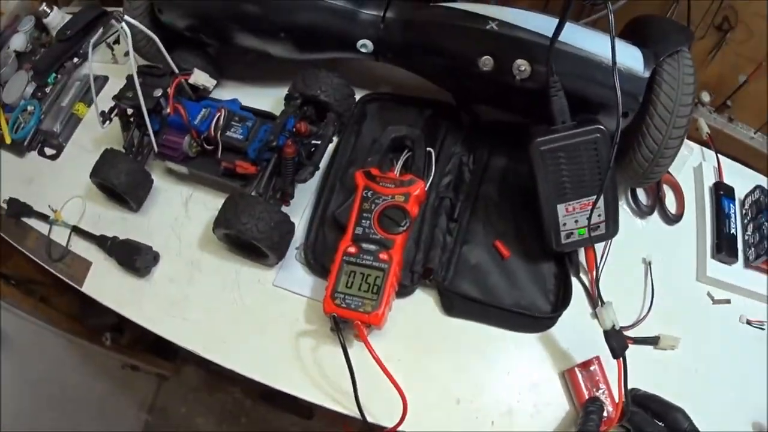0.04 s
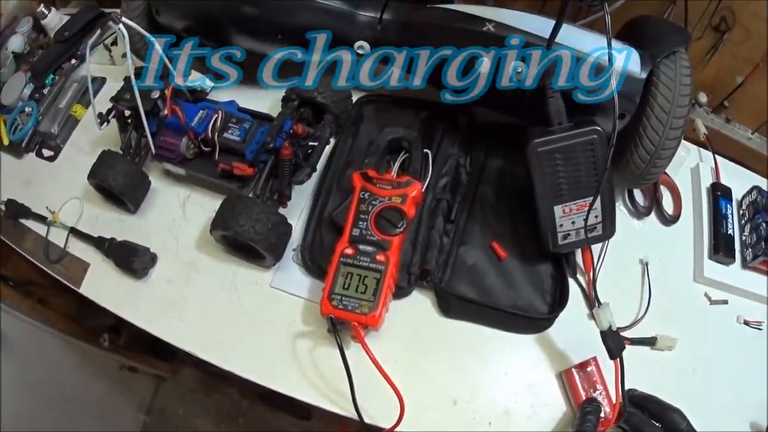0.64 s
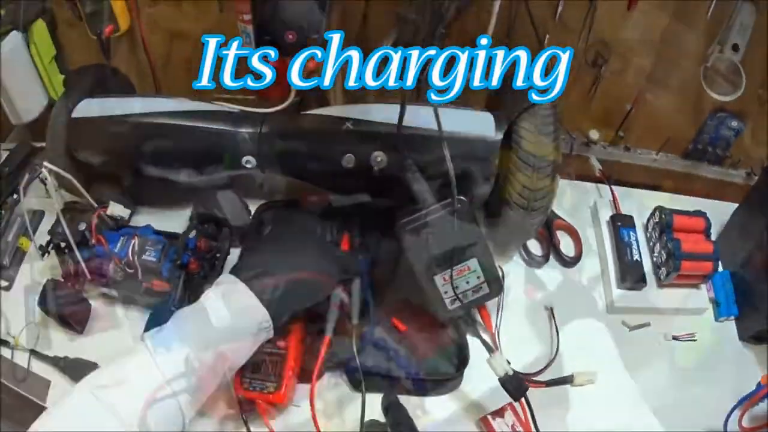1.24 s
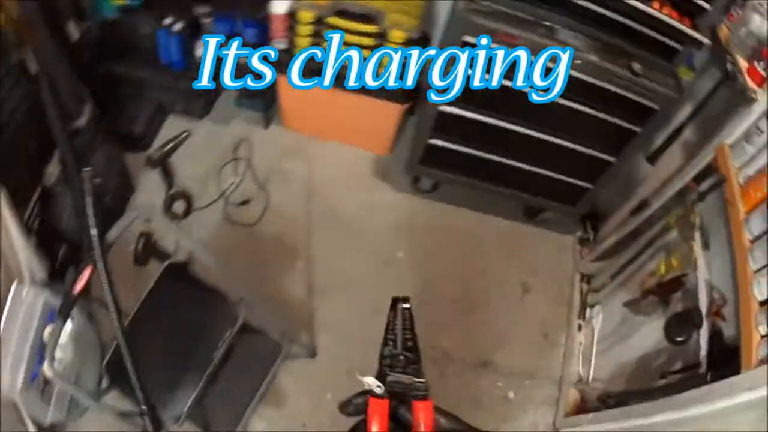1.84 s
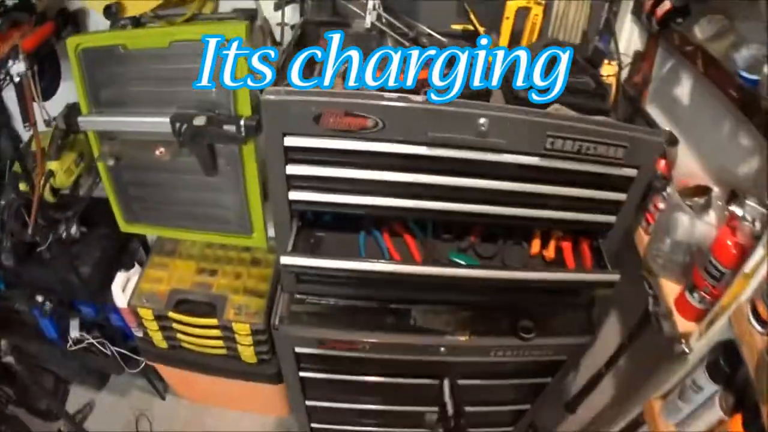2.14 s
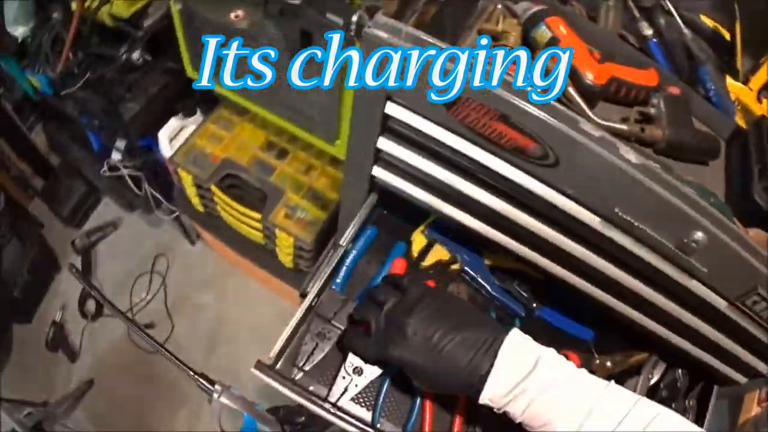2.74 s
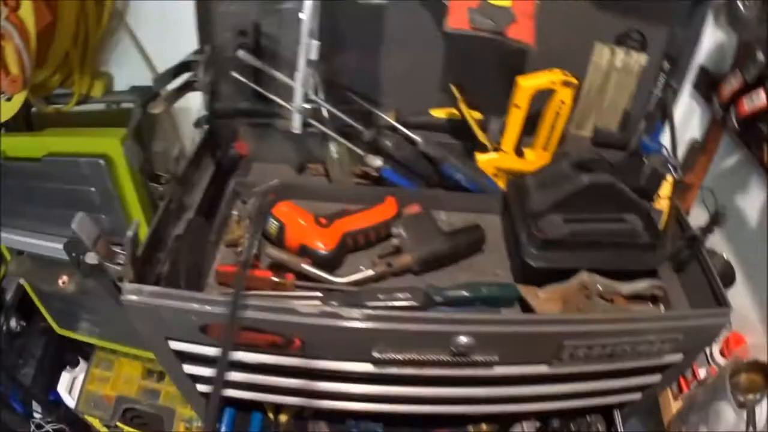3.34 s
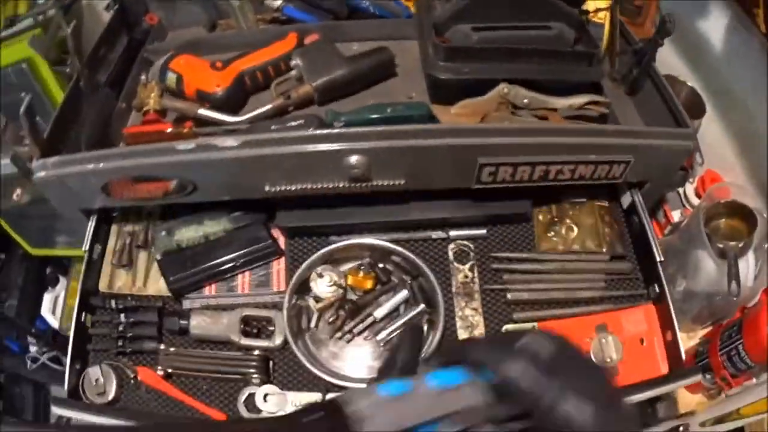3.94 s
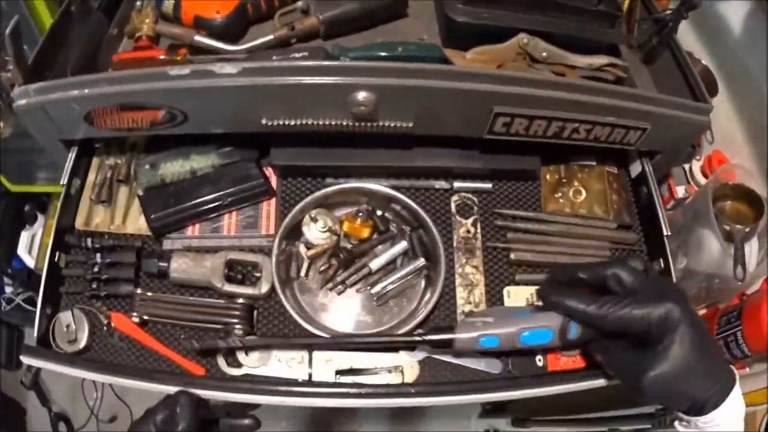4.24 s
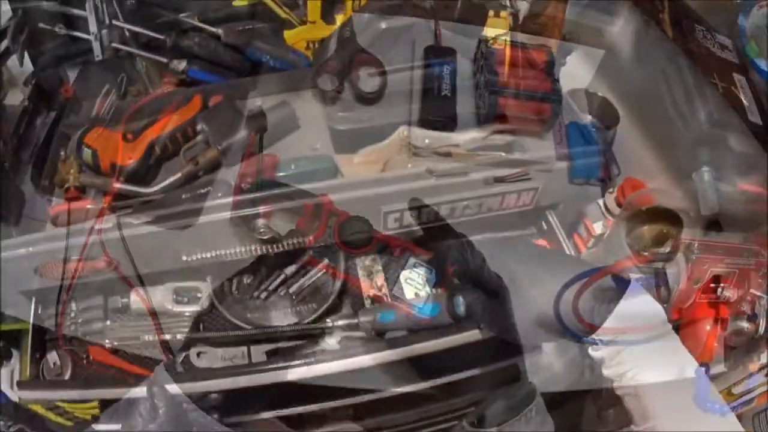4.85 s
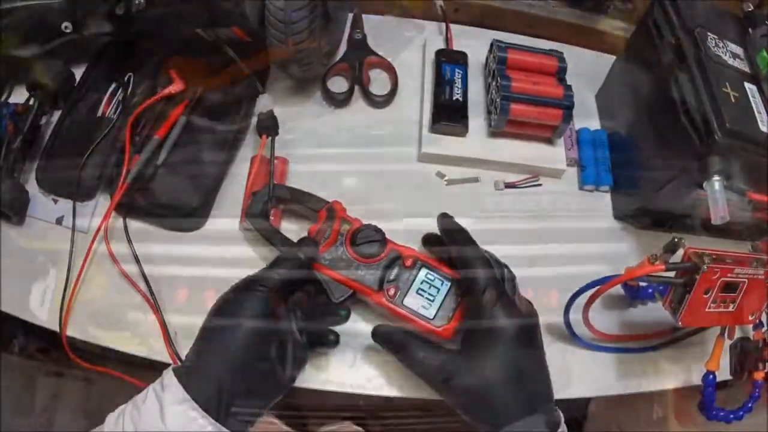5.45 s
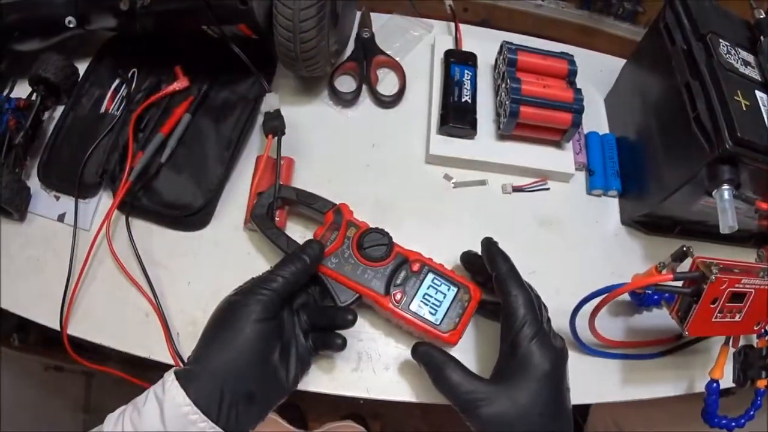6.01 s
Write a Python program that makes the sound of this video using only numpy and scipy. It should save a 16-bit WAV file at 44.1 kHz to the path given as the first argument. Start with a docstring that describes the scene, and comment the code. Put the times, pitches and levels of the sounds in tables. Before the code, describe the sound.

Metal drawers rattle open and shut in a small workshop as someone rummages through clacking steel tools.

```python
"""Steel drawers of a tool chest strike their stops, and hand tools clack together inside them.
Each impact is a short train of contacts that excites the damped modes of the struck body; the chest's
walls boom and a few steel parts ring on. Earlier, a gloved hand sets a meter down on a workbench.
Friction gives the noise of rails, sleeves and gloves, with light ticks and brief squeaks close by.
The small workshop reverberates, and a charger fan hums at first."""
import sys
import numpy as np
from scipy import signal
from scipy.fft import rfft, irfft
from scipy.io import wavfile
from scipy.ndimage import uniform_filter1d

SR = 44100
rng = np.random.default_rng(int(sys.argv[2]) if len(sys.argv) > 2 else 0)


def generate_wav(sig):
    """Save sig (samples, or channels by samples) to the path in sys.argv[1] as 16-bit PCM at SR."""
    pcm = np.round(np.clip(np.atleast_2d(sig).T, -1, 1) * 32767).astype(np.int16)
    wavfile.write(sys.argv[1], SR, pcm)


N = 272490

# Impacts on each body: start_s, strength_db, hardness_db, chatter_s, own_pitch_hz
CHEST_IMPACTS = [(2.4626, -40, 1, 0.017, 1200), (2.4839, -24.5, -1.5, 0.011, 786),
                 (2.6726, -26.5, -0.5, .0066, 1060), (2.7692, -37.5, 3, .002, 1150),
                 (3.123, -22.5, -7, 0.016, 886), (3.151, -25.5, -2.5, 0.0071, 1230),
                 (3.164, -26, -3.5, 0.0093, 1156), (3.181, -27.5, -2, 0.0046, 1150),
                 (3.198, -34.5, -3.5, .0066, 1150), (3.3064, -35.5, -4.5, .003, 900),
                 (3.312, -37, 1.5, .003, 895), (3.3401, -42.5, -0.5, 0.0059, 1010),
                 (3.3833, -44, -8.5, .0033, 1020), (3.4727, -33.5, -1, 0.0079, 910),
                 (3.6133, -37, 12, .0015, 2500), (3.6578, -36.5, 7, .001, 6230),
                 (3.6785, -26, -2, .011, 710), (3.729, -27, -1, .006, 1110), (3.7915, -38, 9.5, .005, 2400),
                 (3.8384, -27.5, 7, 0.0055, 2107), (4.1223, -29, 9.5, 0.026, 2800),
                 (4.2994, -33.5, 9, 0.0043, 4300), (5.3706, -36.5, -1.5, 0.017, 1210),
                 (5.5235, -47.5, -0.5, .0065, 1150), (5.5481, -45, -2, 0.0028, 1260),
                 (5.6087, -45, -4.5, .02, 996)]
TOOL_IMPACTS = [(4.3824, -28.5, 4.5, 0.0035, 3330), (4.476, -33.5, -.5, .002, 2950),
                (4.593, -35, -2, 0.012, 2860), (4.627, -32, -1, .004, 1920), (4.8118, -33, 0.5, .002, 2250),
                (4.902, -29.5, 4.5, 0.018, 2144), (4.9813, -29.5, 3.5, 0.014, 2930),
                (5.054, -37, -2.5, .002, 2050), (5.247, -38.5, -2.5, .003, 1864)]
BENCH_IMPACTS = [(1.282, -40, 2, 0.011, 646), (1.295, -36, 4.5, 0.013, 1867),
                 (1.4415, -28, -6, 0.024, 3130), (1.619, -47, -6.5, 0.013, 752)]
# Normal modes of each body: pitch_hz, gain_db, t60_s
CHEST_MODES = [(349.5, -9.5, 0.067), (822, -5, 0.15), (980, -3, 0.15), (1155, -2, 0.17), (1320, -7.5, 0.24),
               (2170, -6.5, .1), (3060, -2.5, .11), (3850, -4.5, .1)]
TOOL_MODES = [(1004, -5, .081), (1975, -6.5, 0.1), (2430, -5, .12), (2520, -4.5, .12), (3280, -11.5, .2),
              (4230, -10.5, .15), (5810, -13, 0.099)]
BENCH_MODES = [(822, 2, .13), (918, 0, .13), (1368, -4, .13), (1494, -5, .1), (1616, -2, .09),
               (2972, -6, .11), (3383, -8, .1)]
WRENCH_MODES = [(7640, -9, .1), (11213, -3, .14), (11911, -1, .09), (15523, -7, .1)]
DISH_MODES = [(9800, 0.35, 0.17), (15000, 2, 0.15)]
# Body, panel, clack and edge registers of an impact: low_hz, high_hz
REGISTER_BANDS = [(240, 600), (650, 1900), (1900, 6000), (6000, 14800)]
# Jolts of the chest's walls: start_s, level_db
WALL_JOLTS = [(2.501, -47), (3.13, -37), (3.3065, -41.5), (3.684, -31.5), (3.847, -35.5), (5.379, -41),
              (5.609, -41.5)]
# Runs of a drawer on its rails: peak_s, level_db, half_length_s
DRAWER_RUNS = [(2.606, -41.5, 0.021), (3.417, -49, 0.056), (3.755, -42, 0.034)]
# Steel parts set ringing: start_s, level_db
WRENCH_STRIKES = [(4.129, -15)]
DISH_STRIKES = [(3.807, -37), (5.404, -42.5)]
# Small bits with a single mode: start_s, level_db, pitch_hz
STEEL_PINGS = [(3.66, -23, 13600), (4.724, -27, 14850)]
# Light contacts: start_s, level_db, band_hz
LIGHT_TICKS = [(0.9824, -42.5, 2530), (1.5124, -42, 14200), (1.594, -37.5, 11600), (1.816, -57, 3800),
               (1.903, -46, 9000), (1.918, -38, 12500), (1.9252, -30.5, 13000), (2.405, -50, 3200),
               (3.226, -37, 1820), (4.0213, -37.5, 9700), (4.1194, -27, 12400), (4.167, -31, 7140),
               (4.185, -40, 7040), (4.3415, -29, 10300), (4.593, -32.5, 11000), (4.602, -31.5, 11100),
               (4.7005, -44, 3300), (4.7239, -36.5, 9200), (5.041, -37, 3430), (5.151, -48.5, 2600)]
# A pip, then a rising squeak over a steadier one: start_s, length_s, start_hz, end_hz, level_db, roughness
SQUEAK_GLIDES = [(.9405, 0.022, 1100, 1075, -37, 0.012), (.997, .037, 3200, 7400, -47, .06),
                 (.986, .055, 2700, 2850, -48, .1)]
# Rubs of sleeve, glove and shifting tools: peak_s, level_db, half_length_s
SCUFF_STROKES = [(1.334, -47, 0.027), (1.713, -52.5, 0.019), (1.953, -52, .028), (2.037, -53, 0.008),
                 (2.258, -42, 0.0097), (2.675, -41, .014), (2.777, -46.5, 0.012)]
# Thuds of steps, clothes and the chest's frame: start_s, level_db, band_hz, length_s
DULL_THUDS = [(1.535, -46.5, 161, .11), (1.928, -51.5, 413, 0.066), (3.12, -43.5, 222, 0.025),
              (3.122, -52, 42, .04), (5.367, -52.5, 149, 0.05)]
# Stirring of the clothes: time_s, level_db
CLOTHES_LEVELS = [(.93, -64), (1.03, -55.5), (1.45, -49.5), (1.85, -59.5), (2.6, -55), (3.0, -59),
                  (3.85, -50), (4.25, -57), (4.7, -51.5), (5.15, -57), (5.55, -55.5), (5.75, -67.5)]
# Noise spectra of clothes, fan and workshop air: frequency_hz, relative_db
CLOTHES_SPECTRUM = [(160, -28.5), (683, -2.5), (2750, -9), (9930, -15.5), (16000, -17.5)]
FAN_SPECTRUM = [(40, -37.5), (380, -12.5), (1060, -16.5), (2800, -15.5), (4400, -24.5), (16000, -33.5)]
SHOP_SPECTRUM = [(25, -12.5), (241, -7), (685, -13), (3590, -40), (16000, -76)]
# Tones of the fan: pitch_hz, level_db
FAN_TONES = [(413, -70.5), (957, -71)]
# Reverberation time of the workshop: frequency_hz, t60_s
ROOM_DECAY = [(200, 0.2), (1500, 0.17), (12000, 0.14)]

# One value per register: a body's colour, and its shift in dB per dB of contact hardness
CHEST_COLOUR_DB, CHEST_SHIFT = [-10, -1.37, .5, 0.16], [0.011, -0.85, 0.29, 0.66]
TOOL_COLOUR_DB, TOOL_SHIFT = [-17, -6.5, 2, 0.05], [-2.5, -1.5, 0.86, -0.13]
BENCH_COLOUR_DB, BENCH_SHIFT = [-1, 9, 5, -8.5], [-0.11, -0.55, 0.39, 1]
# One value per register: the dense ring's level relative to the crack, and its decay
RING_DB, RING_T60_S = [-8, 9.5, 1, -10], [0.32, 0.1, 0.1, 0.1]
# Stereo width, as side relative to mid
REGISTER_SIDE_DB, NEAR_SIDE_DB, DRAWER_SIDE_DB = [-24, -27.5, -8.5, -11], -13.5, -25
WALL_BAND_HZ = (288, 393)
EVENT_N = SR // 3
EVENT_TIME, SCENE_TIME = np.arange(EVENT_N) / SR, np.arange(N) / SR


def chest():
    """Impact excitation: drawers hit their stops and their load clatters against the sheet steel."""
    return impacts(CHEST_IMPACTS, CHEST_MODES, CHEST_COLOUR_DB, CHEST_SHIFT,
                   modes_db=-13, hump_db=4, own_db=2, breadth=.07)


def wall_booms(t60_s=0.2):
    """Panel resonance: a heavy jolt sets the chest's side walls booming in a narrow low band."""
    out = np.zeros((2, N))
    for start_s, db in WALL_JOLTS:
        jolt = hiss(EVENT_N, DRAWER_SIDE_DB) * decay(t60_s)
        add(out, start_s, burst(band(jolt, *WALL_BAND_HZ, order=2), db))
    return out


def rails(hz=1080, walls_db=-11):
    """Forced vibration: rolling friction drives one broad drawer resonance and sets the walls droning."""
    speed = sum(amp(db) / np.cosh(np.minimum(abs(SCENE_TIME - peak_s) / half_s, 20))
                for peak_s, db, half_s in DRAWER_RUNS)
    friction = hiss(N, DRAWER_SIDE_DB)
    resonance = band(friction, hz / 1.31, hz * 1.22, order=1)
    drawer = band(resonance, hz / 2, hz * 2, order=1)
    walls = band(friction, *WALL_BAND_HZ)
    return speed * (unit_rms(drawer) + amp(walls_db) * unit_rms(walls))


def tools():
    """Collision: shoved tools clack on one another, each with a natural frequency of its own."""
    return impacts(TOOL_IMPACTS, TOOL_MODES, TOOL_COLOUR_DB, TOOL_SHIFT,
                   modes_db=-12, hump_db=5, own_db=-1, breadth=.06)


def tool_slides(lead_db=-19, rise_s=0.058):
    """Sliding friction: a scrape swells just before each tool collides, louder before a hard clack."""
    out = np.zeros((2, N))
    for impact_s, db, hardness_db, _, _ in TOOL_IMPACTS:
        scrape = band(hiss(EVENT_N, DRAWER_SIDE_DB), 1200, 8000, order=1) * decay(rise_s)[::-1]
        add(out, impact_s - EVENT_TIME[-1], burst(scrape, db + hardness_db + lead_db))
    return out


def bench():
    """Impact excitation: the meter's hollow plastic case knocks on the bench top and rings its modes."""
    return impacts(BENCH_IMPACTS, BENCH_MODES, BENCH_COLOUR_DB, BENCH_SHIFT,
                   modes_db=-3, hump_db=12, own_db=-5, breadth=.04)


def impacts(rows, body_modes, colour_db, shift, modes_db, hump_db, own_db, breadth):
    """Superposition: each contact excites a crack and a dense ring; modes hold through the chatter."""
    out, bin_hz = np.zeros((2, N)), np.fft.rfftfreq(EVENT_N, 1 / SR)
    crack_t60_s, own_t60_s = .017, .09
    for start_s, strength_db, hardness_db, chatter_s, own_hz in rows:
        modes = body_modes + [(own_hz, own_db, own_t60_s)]
        # Many weak modes crowd about each main one and colour the dense ring.
        humps = 1 + sum(amp(db + hump_db) / (1 + ((bin_hz / hz - 1) / breadth) ** 2)
                        for hz, db, _ in modes)
        levels_db = strength_db + np.array(colour_db) + hardness_db * np.array(shift)
        train = contacts(chatter_s)
        tones = stereo(ringing(modes, chatter_s), ringing(modes, chatter_s), NEAR_SIDE_DB)
        for k, edges_hz in enumerate(REGISTER_BANDS):
            dense = irfft(rfft(hiss(EVENT_N, REGISTER_SIDE_DB[k])) * humps, EVENT_N)
            dense *= decay(crack_t60_s) + amp(RING_DB[k]) * decay(RING_T60_S[k])
            rattle = signal.fftconvolve(dense, train[None], axes=1)[:, :EVENT_N] / np.linalg.norm(train)
            add(out, start_s, burst(band(rattle + amp(modes_db) * tones, *edges_hz), levels_db[k]))
    return out


def contacts(chatter_s, rate_hz=400, rebound=0.79, first=0.56):
    """Rebound: a first impulse is followed by irregular ones while the part settles."""
    times_s = np.arange(0, max(chatter_s, 1e-4), 1 / rate_hz)
    impulses = rebound * rng.uniform(.35, 1, len(times_s)) ** 2 * rng.choice([-1, 1], len(times_s))
    times_s[1:] += rng.uniform(-.5, .5, len(times_s) - 1) / rate_hz
    impulses[0] = first
    return np.bincount(np.round(times_s * SR).astype(int), impulses)


def ringing(modes, hold_s=0, spread_db=0.6):
    """Modal synthesis: damped sinusoids, weighted anew because each blow lands elsewhere."""
    return sum(amp(db + spread_db * rng.standard_normal()) * decay(t60_s, hold_s)
               * np.sin(2 * np.pi * (hz * EVENT_TIME + rng.random())) for hz, db, t60_s in modes)


def steel_parts(ping_t60_s=.065):
    """Free vibration: small hard parts bounce clear and ring on at high pitches."""
    out, onset = np.zeros((2, N)), 1 - decay(0.017)
    parts = [(WRENCH_MODES, WRENCH_STRIKES), (DISH_MODES, DISH_STRIKES)]
    parts += [([(hz, 0, ping_t60_s)], [(start_s, db)]) for start_s, db, hz in STEEL_PINGS]
    for modes, strikes in parts:
        for start_s, db in strikes:
            add(out, start_s, amp(db) * stereo(ringing(modes), ringing(modes), NEAR_SIDE_DB) * onset)
    return out


def ticks(crack_t60_s=0.0098, ring_db=-14, ring_t60_s=0.12):
    """Transients: single light contacts give a broad band of noise with almost no ring."""
    out = np.zeros((2, N))
    envelope = decay(crack_t60_s) + amp(ring_db) * decay(ring_t60_s)
    for start_s, db, hz in LIGHT_TICKS:
        snap = hiss(EVENT_N, NEAR_SIDE_DB) * envelope
        add(out, start_s, burst(band(snap, hz / 2.56, hz * 1.6, order=2), db))
    return out


def squeaks(overtone_db=-23):
    """Frequency modulation: random jitter roughens a gliding tone and its weak second harmonic."""
    out = np.zeros((2, N))
    for start_s, length_s, start_hz, end_hz, db, roughness in SQUEAK_GLIDES:
        size = round(length_s * SR)
        hz = np.linspace(start_hz, end_hz, size) * (1 + roughness * jitter(size, span=20))
        phase = 2 * np.pi * np.cumsum(hz) / SR
        tone = np.sin(phase) + amp(overtone_db) * np.sin(2 * phase)
        add(out, start_s, amp(db) * tone * signal.windows.tukey(size, .45))
    return out


def scuffs(grain=.35):
    """Friction noise: rubbing swells and fades, grainy with tiny slips."""
    out = np.zeros((2, N))
    for peak_s, db, half_s in SCUFF_STROKES:
        t = np.arange(-4 * half_s, 4 * half_s, 1 / SR)
        slips = np.exp(grain * jitter(len(t), span=70))
        rub = sum(unit_rms(band(hiss(len(t), NEAR_SIDE_DB) * slips, *edges_hz))
                  for edges_hz in REGISTER_BANDS[1:])
        add(out, peak_s + t[0], amp(db) * rub / np.cosh(0.89 * t / half_s))
    return out


def thuds():
    """Soft contact: a slow push puts its energy into low frequencies."""
    out = np.zeros((2, N))
    for start_s, db, hz, length_s in DULL_THUDS:
        rise = 3 * EVENT_TIME / length_s
        rumble = unit_rms(band(hiss(EVENT_N, NEAR_SIDE_DB), hz / 2, hz * 1.7, order=2))
        add(out, start_s, amp(db) * rumble * rise * np.exp(1 - rise))
    return out


def clothes(folds_db=2.8):
    """Amplitude modulation: the rustle follows the stirring of the cloth and flickers with its folds."""
    level_db = np.interp(SCENE_TIME, *np.transpose(CLOTHES_LEVELS)) + folds_db * jitter(N, span=700)
    return amp(level_db) * shaped_noise(CLOTHES_SPECTRUM, side_db=-2.5)


def fan(air_db=-61):
    """Tonal and broadband noise: a charger fan hums, wavering in phase, over its rush of air."""
    rush = amp(air_db) * shaped_noise(FAN_SPECTRUM, side_db=-1.4)
    hum = np.zeros(N)
    for hz, db in FAN_TONES:
        drift = np.cumsum(rng.standard_normal(N)) / 80
        hum += amp(db) * unit_rms(np.sin(2 * np.pi * hz * SCENE_TIME + drift))
    return rush + hum


def background(shop_db=-63, turn_s=(1.1, 1.6)):
    """Ambient noise: the fan gives way to the workshop's air as the listener turns away."""
    away = np.interp(SCENE_TIME, turn_s, [0, 1])
    return (1 - away) * fan() + away * amp(shop_db) * shaped_noise(SHOP_SPECTRUM, side_db=-10)


def room(x, delay_s=0.00209, treble_db=-5):
    """Reverberation: a small cluttered room returns a diffuse tail whose treble dies first."""
    hz, t, spectra = signal.stft(hiss(SR // 2, NEAR_SIDE_DB), SR, nperseg=256)
    colour_db = log_interp([(1000, 0), (10000, treble_db)], hz)[:, None]
    loss_db = 60 * t / log_interp(ROOM_DECAY, hz)[:, None]
    tail = signal.istft(spectra * amp(colour_db - loss_db), SR, nperseg=256)[1]
    tail[:, :round(delay_s * SR)] = 0
    return signal.fftconvolve(x, tail / np.linalg.norm(tail[0]), axes=1)[:, :N]


def amp(db):
    """Decibels to amplitude ratio."""
    return 10 ** (np.asarray(db) / 20)


def unit_rms(x):
    """Normalisation to rms 1."""
    return x / np.sqrt(np.mean(x ** 2) + 1e-20)


def burst(x, db):
    """Equal energy: scales a stereo burst to match 10 ms at this level."""
    return x * amp(db) * np.sqrt(SR / 100 / (np.sum(x ** 2) / 2 + 1e-20))


def log_interp(points, hz):
    """Interpolation on a log-frequency axis."""
    points_hz, values = np.transpose(points)
    return np.interp(np.log(hz + 1), np.log(points_hz), values)


def add(mix, start_s, sound):
    """Superposition of a sound on the mix."""
    part = mix[:, max(round(start_s * SR), 0):][:, :sound.shape[-1]]
    part += sound[..., :part.shape[1]]


def band(x, low_hz, high_hz, order=3):
    """Causal band-pass filter."""
    sections = signal.butter(order, [low_hz, min(high_hz, SR / 2 - 1)], "band", fs=SR, output="sos")
    return signal.sosfilt(sections, x)


def decay(t60_s, hold_s=0):
    """Exponential damping: holds, then falls by 60 dB in t60_s."""
    return np.exp(-np.log(1000) * np.maximum(EVENT_TIME - hold_s, 0) / max(t60_s, 1e-3))


def stereo(mid, side, side_db):
    """Left and right from an in-phase and an antiphase part."""
    return mid + amp(side_db) * np.array([side, -side])


def hiss(size, side_db):
    """White noise, partly correlated between the ears."""
    return stereo(*rng.standard_normal((2, size)), side_db)


def jitter(size, span):
    """Random fluctuation of rms 1, smoothed over span samples."""
    return unit_rms(uniform_filter1d(rng.standard_normal(size), size=span))


def shaped_noise(spectrum, side_db):
    """Stationary noise of rms 1 with the given spectral shape."""
    gains = amp(log_interp(spectrum, np.fft.rfftfreq(N, 1 / SR)))
    return unit_rms(irfft(rfft(hiss(N, side_db)) * gains, N))


def scene(room_db=-19):
    """Superposition of direct sound, reverberation of the handling, and background."""
    near = ticks() + squeaks()
    handling = bench() + chest() + wall_booms() + tools() + tool_slides() + rails()
    handling += steel_parts() + scuffs() + thuds()
    return near + handling + amp(room_db) * room(handling) + clothes() + background()


def record(dry, cutoff_hz=15900):
    """Band limiting: a linear-phase low-pass removes the highest treble."""
    low_pass = signal.firwin(401, cutoff_hz, window=("kaiser", 8), fs=SR)
    return signal.oaconvolve(dry, low_pass[None], "same")


dry = scene()
out = record(dry)
generate_wav(out)
```